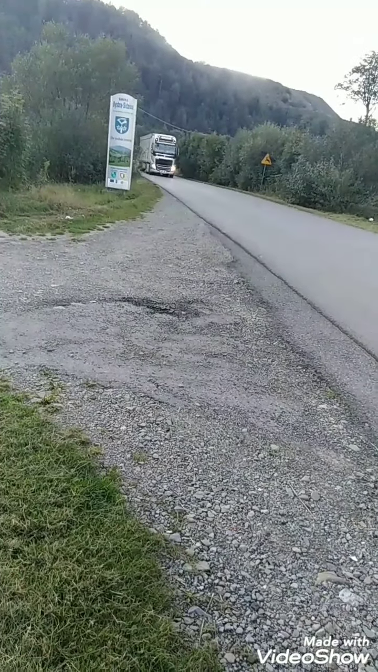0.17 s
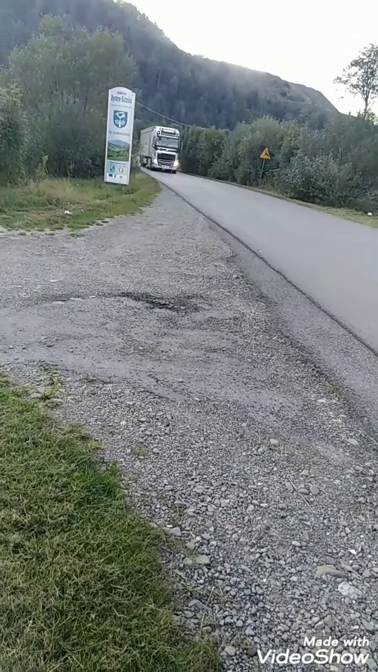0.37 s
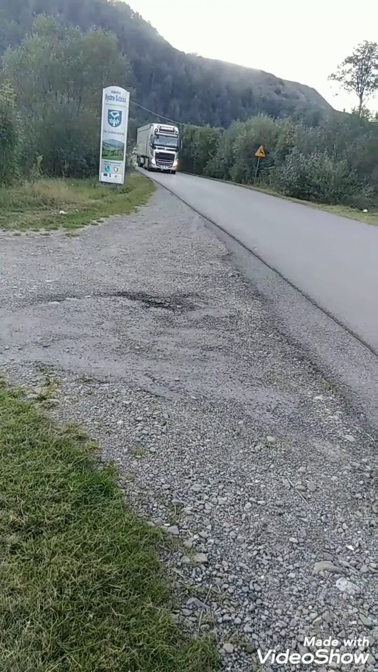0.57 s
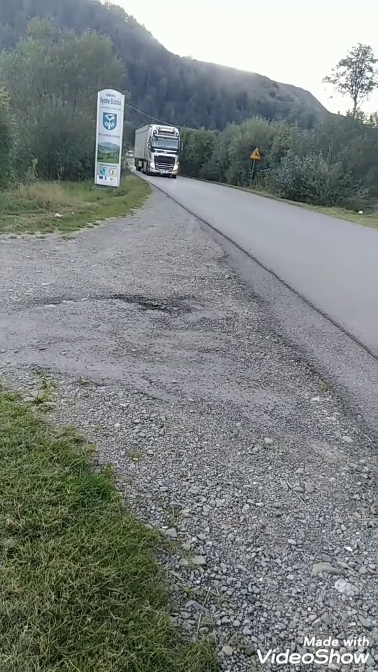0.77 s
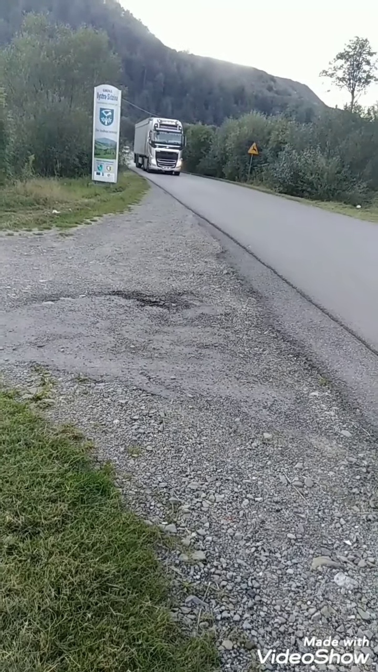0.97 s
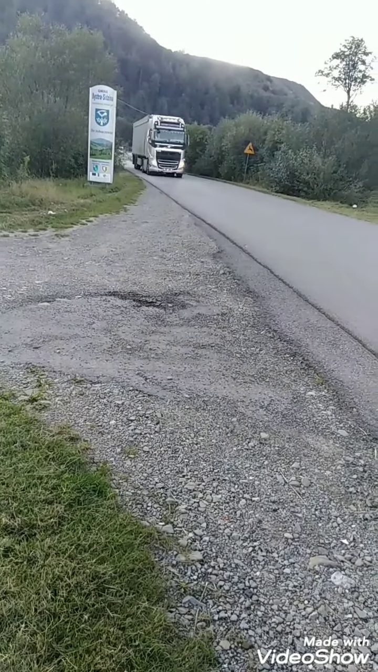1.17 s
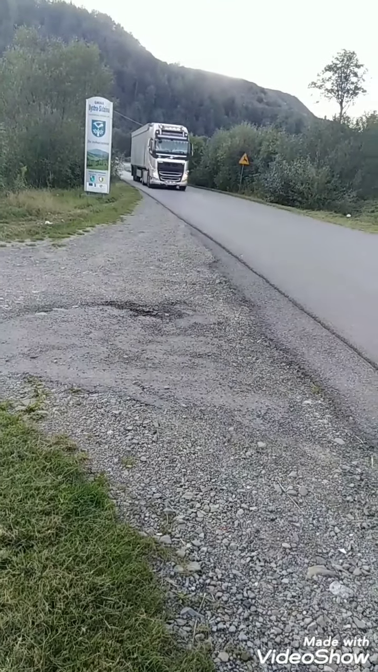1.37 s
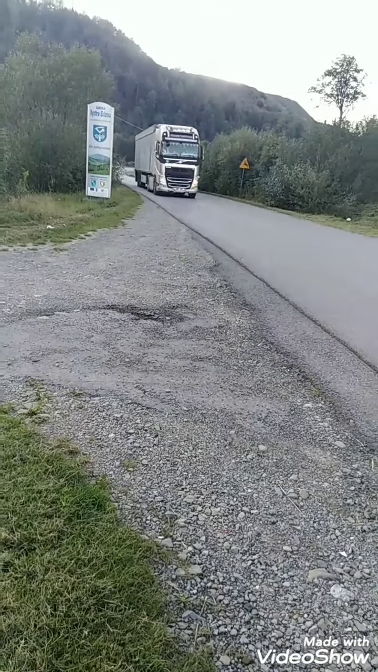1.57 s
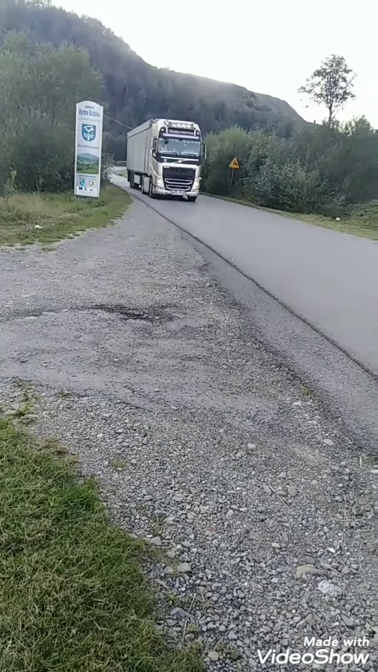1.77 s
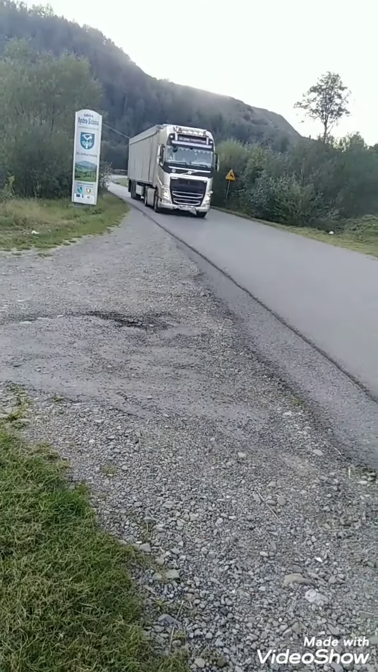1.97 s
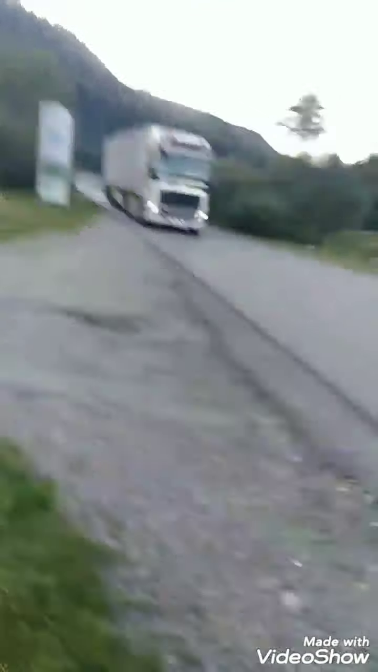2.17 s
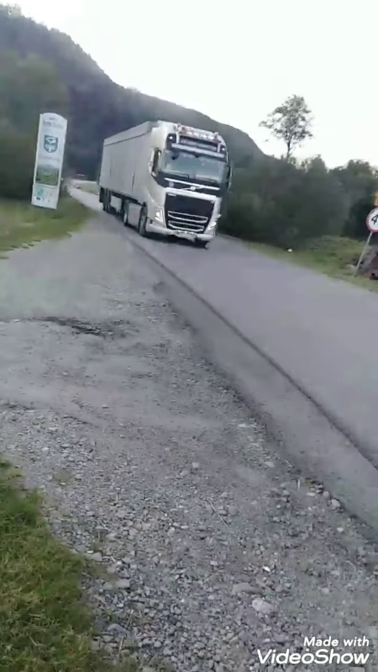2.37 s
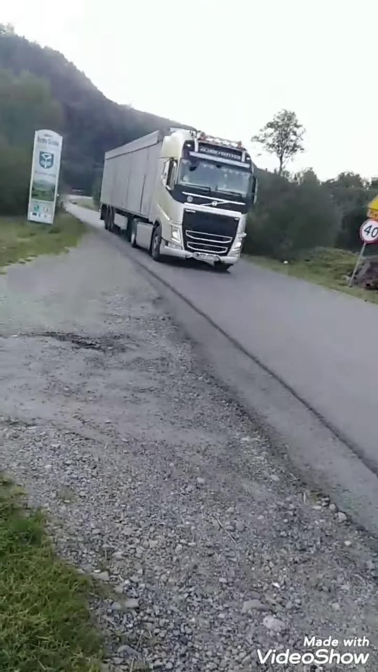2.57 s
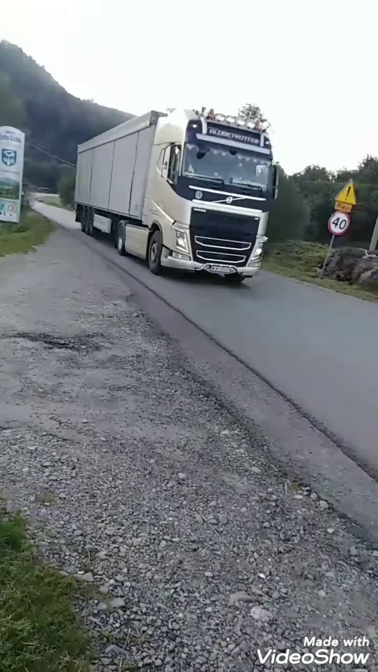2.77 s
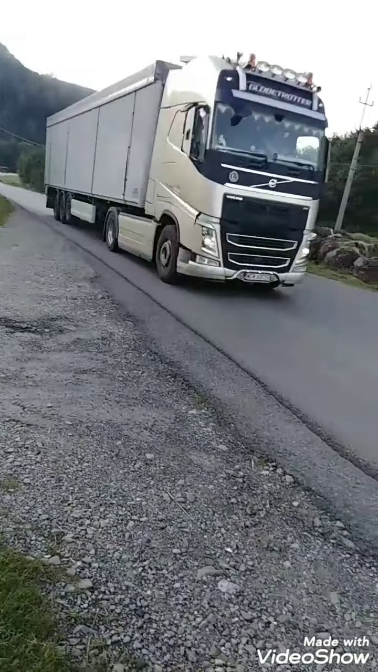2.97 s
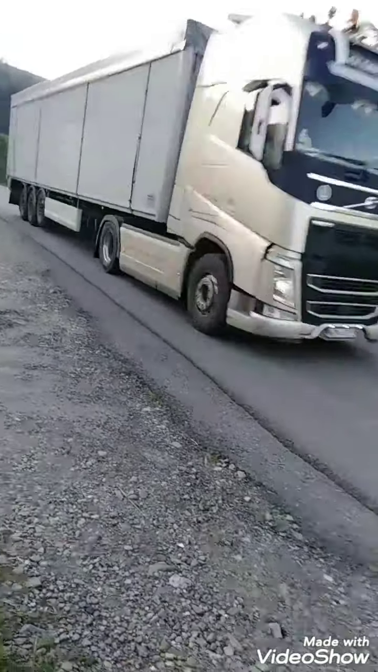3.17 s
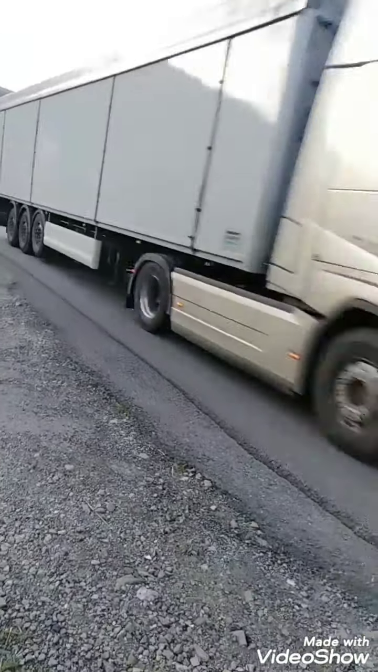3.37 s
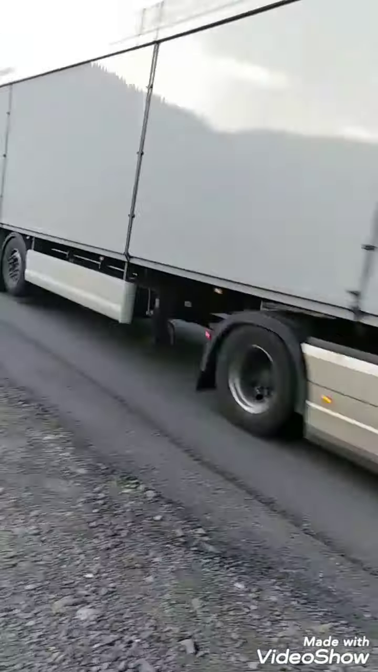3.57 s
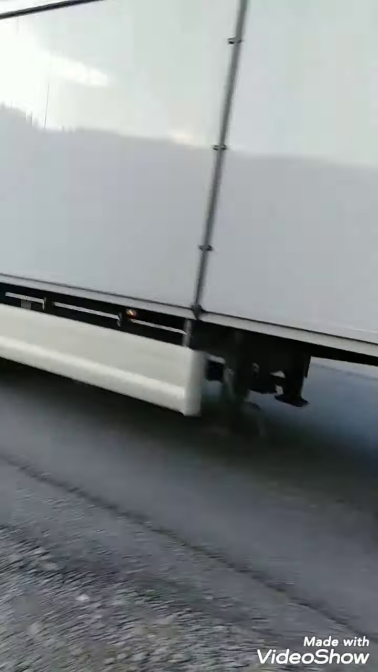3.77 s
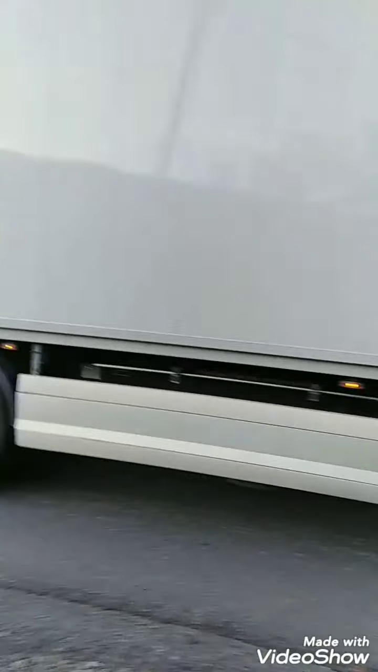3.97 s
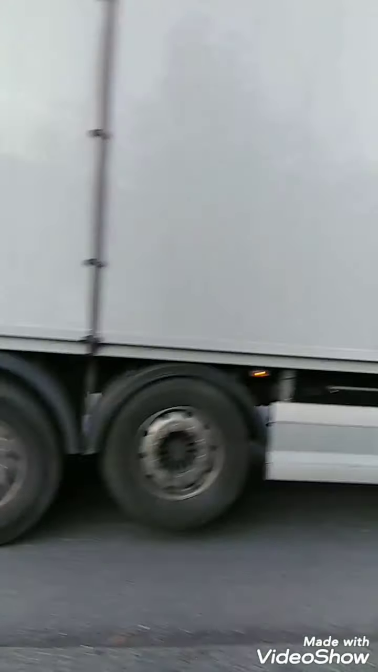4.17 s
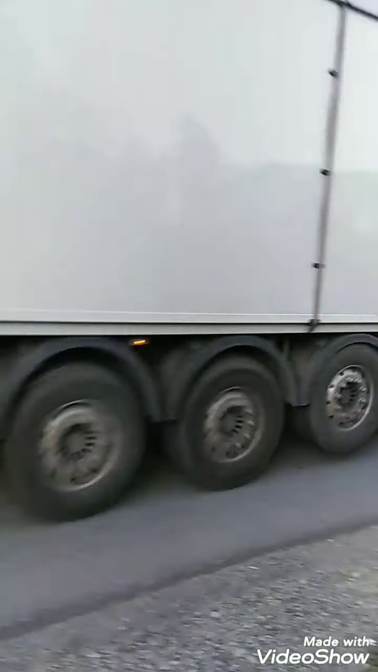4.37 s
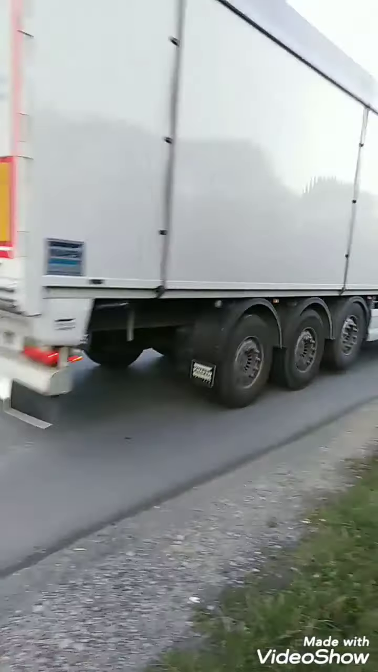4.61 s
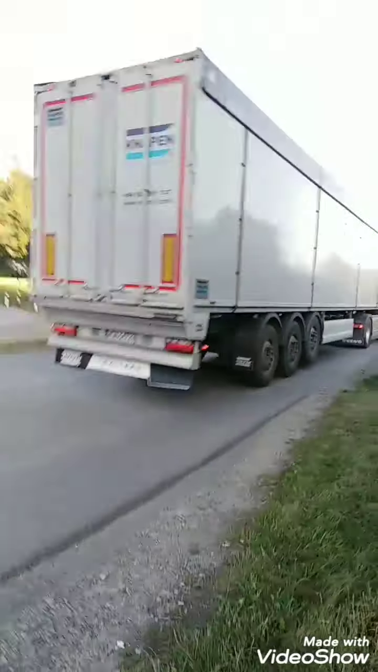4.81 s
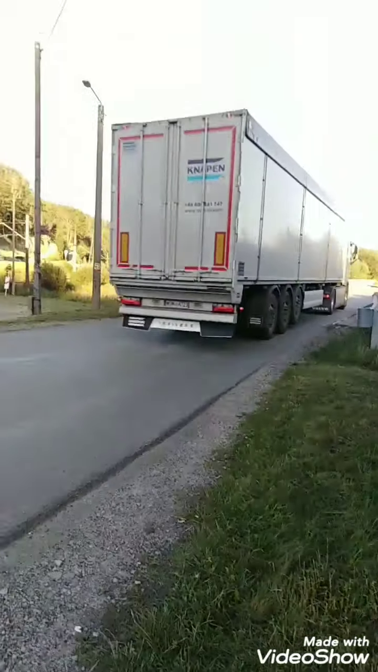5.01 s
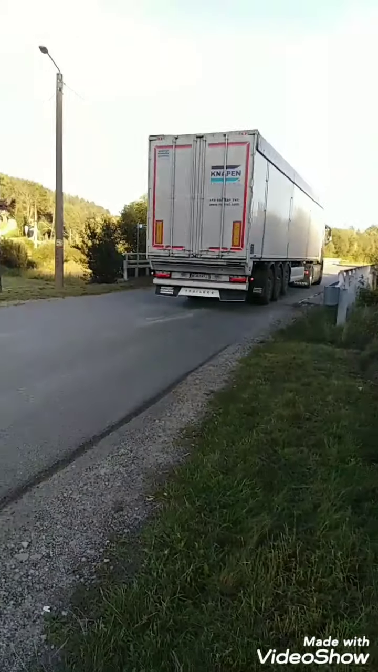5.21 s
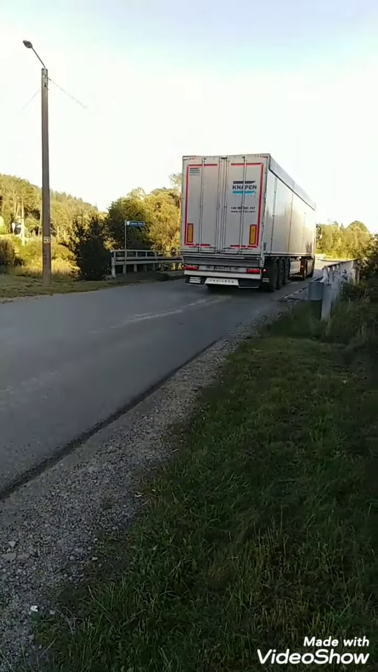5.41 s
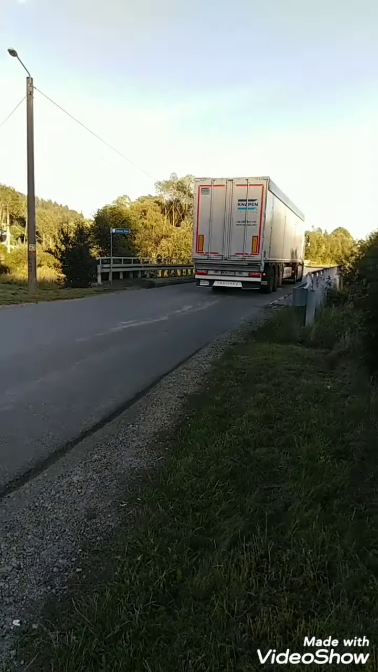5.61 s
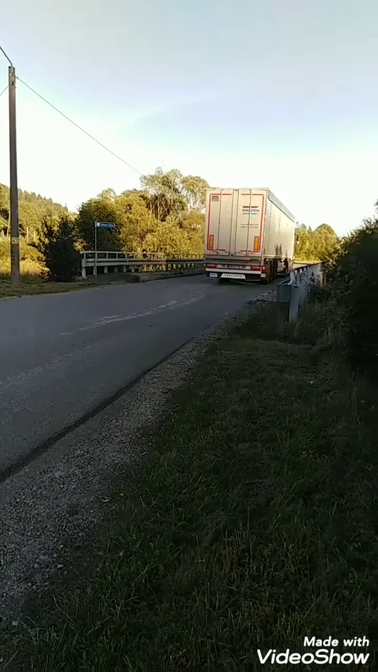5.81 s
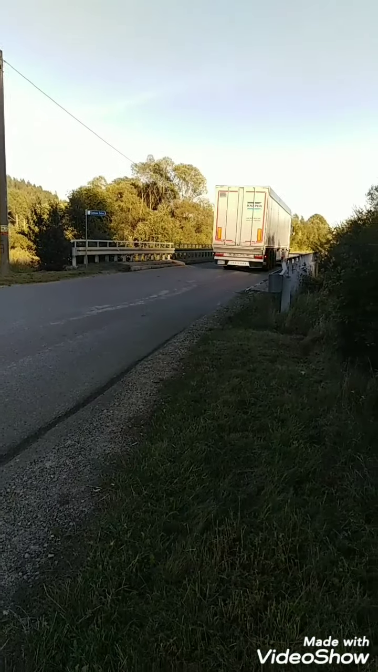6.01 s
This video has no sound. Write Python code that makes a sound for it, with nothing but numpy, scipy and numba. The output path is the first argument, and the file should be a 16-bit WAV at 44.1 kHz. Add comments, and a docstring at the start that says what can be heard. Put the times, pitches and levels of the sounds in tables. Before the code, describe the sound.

An articulated truck nears steadily, engine humming beneath growing road noise. Its air horns blare once, long and brassy, pause with an echoing tail, then give a short, very loud toot almost beside the stereo phone microphone. The trailer sweeps by with rumbling air, howling tyres, gritty cracks and a thin airy whistle, before everything recedes.

```python
"""A diesel drone and tyre roar come up a country road: an articulated truck nears a phone at the roadside.
Its twin air horns sound one long blast, then a short toot from close by; reeds chop air into bells that brighten
with pressure, bounce off the asphalt and echo from hedge, trees and hillside. Filtered noise makes the road sound,
narrow resonances howl and whistle, and grit cracks behind. A limiter ducks the road under loud blasts."""
import sys
import numpy as np
from scipy import signal
from scipy.fft import rfft, irfft
from scipy.io import wavfile
from scipy.ndimage import minimum_filter1d
from numba import njit

SR = 44100
rng = np.random.default_rng(int(sys.argv[2]) if len(sys.argv) > 2 else 0)


def log_audio(samples):
    """Write samples as a 16-bit WAV file to the path given in sys.argv[1]."""
    # one column per channel
    frames = np.atleast_2d(samples).T
    # limit to full scale, then quantise
    limited = np.clip(frames, -1, 1)
    pcm = np.round(limited * 32767).astype(np.int16)
    wavfile.write(sys.argv[1], SR, pcm)


N = 266805
TIME = np.arange(N) / SR
FREQ = np.maximum(np.fft.rfftfreq(N, 1 / SR), 1)

# Where the truck lies as the phone turns after it.
# Each row: time in seconds, lag of the left microphone port in ms, apparent width 0-1.
BEARING = [(0, 0.2, 0.65), (3.1, 0.19, 1), (3.6, -0.04, 0.8), (4.7, -0.04, 0.65), (5.3, 0.1, 0.78)]

# the drive: steady speed, moment the cab is abreast, closest distance, heights above the road
SPEED_M_S, CAB_S, KERB_M, HORN_HEIGHT_M, PHONE_HEIGHT_M = 15, 3.305, 3.9, 4.03, 1.135
SOUND_M_S = 343
# the middle of the truck is abreast at MIDDLE_S; its flank fills the view for ALONGSIDE_S on either side
MIDDLE_S, ALONGSIDE_S = 4, 1.05
FIRING_HZ = 79.6  # at the source, before the Doppler shift

# air fills a horn fast; the standing wave builds; partials above the edge fade, and the edge follows the pressure
FILL_S, BUILD_S, EDGE_HZ, SLACK_EDGE_HZ, EDGE_STEEPNESS = 0.045, 0.042, 20000, 300, 2.5
# the opening bark is brief; the pitch trembles (share), most while a reed catches
BARK_S, JITTER, RASP_S = 0.024, 0.0029, 0.011
# rising pressure pushes a reed flat; over a held blast the pitch creeps up
SAG_S, CREEP_HZ_PER_S = 0.025, 3
# a reed jumps to pitch, overshoots and settles; it runs sharp on slack air and droops after the valve shuts
CATCH_S, OVERSHOOT_HZ, SETTLE_S = 0.005, 1.5, 0.05
SLACK_HZ, DROOP_HZ_PER_S, DROOP_AFTER_S = 2, 45, 0.06
# the valve eases once during the long blast: time, half length, share of pressure lost
EASE_S, EASE_HALF_S, EASE_SHARE = 2.35, 0.033, 0.76
# the reeds stall this long after the valve shuts; a blast swells as the cab nears, its fundamental most
STALL_S, SWELL_DB_PER_S, BOOM_DB_PER_S = 0.085, 5.5, 14


def undb(db):
    """Decibels to amplitude."""
    return 10 ** (np.asarray(db) / 20)


def unit(x):
    """Scale to rms 1."""
    return x / np.sqrt(np.mean(x ** 2))


def curves(table):
    """The columns of a table, joined by straight lines in time."""
    s, *columns = np.transpose(table)
    return [np.interp(TIME, s, column) for column in columns]


def shape(points, hz):
    """A spectrum in dB, read on a log-frequency axis."""
    f, db = np.transpose(points)
    return np.interp(np.log(hz), np.log(f), db)


def colour(x, points):
    """Filter by a spectrum."""
    return irfft(rfft(x) * undb(shape(points, FREQ)), N)


def delay(x, ms):
    """A fixed or moving delay."""
    return np.interp(TIME - ms / 1000, TIME, x)


def walk(rate):
    """Smooth chance with spread 1, moving about rate times a second."""
    return unit(irfft(rfft(rng.standard_normal(N)) / (1 + (FREQ / rate) ** 4), N))


def along(abreast_s):
    """Metres down the road of a part of the truck: negative while it approaches."""
    return SPEED_M_S * (TIME - abreast_s)


def doppler(abreast_s):
    """Pitch factor of a part that drives past: above 1 on approach, below 1 going away."""
    x = along(abreast_s)
    return 1 / (1 + SPEED_M_S / SOUND_M_S * x / np.hypot(x, KERB_M))


def passing(*names):
    """Joint gain of sources: each falls as 1 / distance, with extra loss ahead of and behind it."""
    # Noise and tone sources along the truck. Each row: abreast in seconds, level then in dB, reach in m,
    # extra loss while it approaches in dB per m, extra loss while it recedes in dB per m.
    sources = { "tractor rumble": (3.55, -33, 6.8, 0.01, 0.03),
               "trailer rumble": (4.3, -35.5, 6, 0.01, 0.1), "front churn": (3.85, -32, 3, 0.02, 0.5),
               "rear churn": (4.35, -34.5, 2.5, 0.02, 0.5), "tractor roar": (3.58, -28, 6.5, 0.135, 0.26),
               "trailer roar": (4.35, -27.3, 5.7, 0.14, 0.28), "tractor hiss": (3.55, -35, 5, 0.04, 0.2),
               "trailer hiss": (4.45, -37, 4.6, 0.04, 0.22),
               "tractor spray": (3.55, -37.5, 4.2, 0.175, 0.75),
               "trailer spray": (4.45, -44, 3.6, 0.17, 0.58), "diesel": (3.2, -42.8, 24, 0.04, 0),
               "tread song": (3.4, -46, 12, 0.01, 0.6), "howl": (4.35, -32, 7, 0.03, 0.55),
               "whistle": (4.8, -44.3, 3, 3, 0.01), }
    power = 0
    for name in names:
        abreast_s, db, reach_m, ahead_db, behind_db = sources[name]
        x = along(abreast_s)
        r = np.hypot(x, reach_m)
        loss_db = np.where(x < 0, ahead_db, behind_db) * (r - reach_m)
        power = power + (undb(db - loss_db) * reach_m / r) ** 2
    return np.sqrt(power)


def diesel():
    """Six even cylinders, strongest at twice the firing rate; the pitch falls as the cab goes by."""
    hz = FIRING_HZ * doppler(CAB_S)
    phase = 2 * np.pi * np.cumsum(hz * (1 + 0.0068 * walk(11))) / SR
    drone = 0
    for k, order_db in enumerate((-2, 3.5, -21, -36), 1):
        drone = drone + undb(order_db + 2.3 * walk(14)) * np.sin(k * phase)
    return passing("diesel") * unit(drone), phase


def wide_noise(points, spread_hz):
    """Noise much alike at both ports in the bass, ever less alike above spread_hz; its width follows the bearing."""
    lag_ms, width = curves(BEARING)
    likeness = 0.88 / (1 + (FREQ / spread_hz) ** 2)
    mid = irfft(rfft(rng.standard_normal(N)) * np.sqrt(1 + likeness), N)
    side = irfft(rfft(rng.standard_normal(N)) * np.sqrt(1 - likeness), N)
    mid, side = colour(mid, points), width * colour(side, points)
    return np.array([delay(mid + side, lag_ms), mid - side]) / np.std(mid)


def road_noise(firing):
    """Exhaust and body rumble, air churns under the trailer, treads roar, hiss and spray on the asphalt."""
    # Road noise colours. Each row: frequency in Hz, relative density in dB per Hz.
    rumble_colour = [(25, -32), (42, -31), (52, 1.5), (70, -4.5), (105, 3), (170, -0.5), (230, -0.5),
                     (300, -7.5), (400, -16), (700, -50)]
    churn_colour = [(150, -4), (260, 5.5), (400, 1.5), (500, 8.5), (800, -71)]
    roar_colour = [(380, -67), (480, -3.5), (600, 0.5), (800, -1.5), (1000, 1.5), (1300, -0.5), (1700, 1.5),
                   (2000, -9), (2400, -16), (2900, -10), (5000, -40)]
    hiss_colour = [(1500, -19.5), (2300, 8), (2850, -2.5), (3200, 2.5), (4200, -0.5), (6000, -5),
                   (7500, -15), (12000, -47)]
    spray_colour = [(4500, -6.5), (7000, -1.5), (10000, -1.5), (12000, -3), (14500, -9)]
    rumble = wide_noise(rumble_colour, spread_hz=400) * passing("tractor rumble", "trailer rumble")
    churn = wide_noise(churn_colour, spread_hz=540) * passing("front churn", "rear churn")
    roar = wide_noise(roar_colour, spread_hz=680) * passing("tractor roar", "trailer roar")
    roar = roar * undb(0.8 * walk(9))
    hiss = wide_noise(hiss_colour, spread_hz=630) * passing("tractor hiss", "trailer hiss")
    # the hiss pulses slightly with the firing of the diesel
    hiss = hiss * undb(0.5 * walk(28)) * (1 + 0.093 * np.cos(firing))
    spray = wide_noise(spray_colour, spread_hz=2300) * passing("tractor spray", "trailer spray")
    spray = spray * undb(0.97 * walk(40))
    return rumble + churn + roar + hiss + spray


def singing(name, far_hz, near_hz, width_hz):
    """A narrow resonance, driven by noise, that is higher while the truck is alongside."""
    alongside = 1 / (1 + ((TIME - MIDDLE_S) / ALONGSIDE_S) ** 8)
    phase = 2 * np.pi * np.cumsum(far_hz + (near_hz - far_hz) * alongside) / SR
    band = walk(width_hz / 2) * np.cos(phase) + walk(width_hz / 2) * np.sin(phase)
    tone = passing(name) * unit(band)
    return np.array([delay(tone, curves(BEARING)[0]), tone])


def pressure(t, opens_s, shuts_s, bleed_s):
    """Air pressure 0-1: an S-shaped rise, a hold, then a bleed that is fast at first and slow at the end."""
    rise = (1 - np.exp(-(t - opens_s) / FILL_S)) ** 3
    ease = 1 - EASE_SHARE * np.exp(-((t - EASE_S) / EASE_HALF_S) ** 2)
    bleed = (1 + np.maximum(t - shuts_s, 0) / bleed_s) ** 2
    return np.maximum(rise * ease / bleed, 1e-6)


def reed(t, catches_s, shuts_s, pitch_hz, flat_hz, rasp, air):
    """Pitch of a reed: starts in tune, is pushed flat until it catches with a rasp, droops once the air is gone."""
    age = t - t[0]
    caught = (1 + np.tanh((t - catches_s) / CATCH_S)) / 2
    pushed = 1 - np.exp(-(age / SAG_S) ** 2)
    hz = pitch_hz + CREEP_HZ_PER_S * age - flat_hz * pushed * (1 - caught)
    hz = hz + OVERSHOOT_HZ * caught * np.exp(-np.abs(t - catches_s) / SETTLE_S)
    hz = hz + SLACK_HZ * (1 - air) - DROOP_HZ_PER_S * np.maximum(t - shuts_s - DROOP_AFTER_S, 0)
    catching = rasp * np.exp(-((t - catches_s) / RASP_S) ** 2)
    return hz * (1 + JITTER * walk(90)[:len(t)] + catching * walk(260)[:len(t)])


def trumpet(t, hz, edge_hz, bark_share, close, boom_db, ring_db, flutter,
            bounce=0.42, lag_ms=0.35, max_lag_rad=1.8, dispersion=0.06, count=52):
    """A reed chops air into a horn; the wave steepens with pressure and arrives again off the road."""
    # Radiation of the bells at full pressure. Each row: frequency in Hz, relative level per partial in dB.
    bell = [(270, -12), (540, -14.5), (810, -12.5), (1080, -12), (1350, -8), (1620, -8), (1900, -11),
            (2700, -13.5), (3800, -17), (5000, -22.5), (7500, -26.5), (10000, -25), (12000, -35),
            (14500, -30)]
    # A horn speaks first with a bark at its strongest resonances.
    # Each row: frequency in Hz, boost from afar in dB, boost from close below in dB.
    bark_points = [(270, 23, -3), (540, 24, 16), (810, 17, -26), (1080, -6, -14), (1620, 2, -12),
                   (2700, 0, 2)]
    bark = [(f, far_db + close * (close_db - far_db)) for f, far_db, close_db in bark_points]
    phase = 2 * np.pi * np.cumsum(hz) / SR
    # the path by way of the asphalt is longer than the straight one
    r = np.hypot(SPEED_M_S * (t - CAB_S), KERB_M)
    bounced_m = np.hypot(r, HORN_HEIGHT_M + PHONE_HEIGHT_M)
    detour_m = bounced_m - np.hypot(r, HORN_HEIGHT_M - PHONE_HEIGHT_M)
    road = 2 * np.pi * hz * detour_m / SOUND_M_S
    port = 2 * np.pi * hz * lag_ms / 1000
    knots = t[0] + np.arange(32) / 28  # the flutter takes a new course 28 times a second
    total, centre = 0, np.median(hz)
    for k in range(1, count + 1):
        # once the reed has stalled, the higher partials ring down faster
        db = shape(bell, k * centre) + boom_db * (k == 1) + bark_share * shape(bark, k * centre) + k * ring_db
        gain = undb(db) / (1 + (k * centre / edge_hz) ** EDGE_STEEPNESS)
        # the standing wave takes time to build, longest for the fundamental
        gain = gain * (1 - np.exp(-((t - t[0]) * k / BUILD_S) ** 2))
        # moving reflections make each partial flutter at each port, the short waves most
        stray = rng.standard_normal((2, len(knots))) + 1j * rng.standard_normal((2, len(knots)))
        stray = np.array([np.interp(t, knots, row) for row in stray])
        stray = flutter * np.tanh(k * centre / 900) * stray
        # the left port lags, by a phase that levels off for short waves
        lag = max_lag_rad * np.tanh(k * port / max_lag_rad)
        wave = np.exp(1j * (np.array([k * phase - lag, k * phase]) + dispersion * k * k))
        total = total - gain * np.real(wave * (1 + bounce * np.exp(-1j * k * road) + stray))
    return total


def horns(opens_s, catches_s, shuts_s, bleed_s, ring_t60, pitch_hz, flat_hz, rasp, level_db, boom_db, close,
          far_flutter=0.7, near_flutter=0.4, left_db=0.5):
    """One sounding at both ports: air drives reed and bell; close by it is louder and less blurred by reflections."""
    # The bells heard from close below. Each row: frequency in Hz, gain in dB, left minus right in dB.
    close_colour = [(270, -3, -1), (540, 8, -1), (810, 10.5, 0), (1080, 6, 0), (1500, 7.5, 0),
                    (2700, 3.5, 0), (4500, 3.5, 1), (8000, 9, 4), (13000, 12, 2)]
    on = (TIME > opens_s) & (TIME < shuts_s + 0.4)
    t, out = TIME[on], np.zeros((2, N))
    air = pressure(t, opens_s, shuts_s, bleed_s)
    hz = reed(t, catches_s, shuts_s, pitch_hz, flat_hz, rasp, air)
    edge_hz = EDGE_HZ * air + SLACK_EDGE_HZ * (t > shuts_s)
    bark_share = np.exp(-(t - opens_s) / BARK_S)
    blown_s = np.minimum(t, shuts_s) - opens_s
    ring_db = -60 * np.maximum(t - shuts_s - STALL_S, 0) / ring_t60
    flutter = far_flutter + close * (near_flutter - far_flutter)
    boom_db = boom_db + BOOM_DB_PER_S * blown_s
    tone = trumpet(t, hz, edge_hz, bark_share, close, boom_db, ring_db, flutter)
    out[:, on] = undb(SWELL_DB_PER_S * blown_s) * tone
    ports = []
    for port, side in zip(out, (1, -1)):
        tint = [(f, level_db + side * left_db + close * (db + side * pan_db / 2))
                for f, db, pan_db in close_colour]
        ports.append(colour(port, tint))
    return np.array(ports)


def scatter(x, t60, start_s):
    """A diffuse tail that builds up over start_s, different at each port."""
    tail = rng.standard_normal((2, N)) * undb(-60 * TIME / t60) * (1 - np.exp(-(TIME / start_s) ** 2))
    return signal.fftconvolve(x[None], unit(tail) / np.sqrt(N), axes=1)[:, :N]


def valley(horn, gravel_db=-5, trees_db=-18.5, hedge_db=-16, hedge_s=0.085, hill_db=-26, hill_s=0.3):
    """Gravel scatters the treble at once; a hedge slaps back, trees give a long tail, the hillside one late echo."""
    # Colour of the echo from the trees. Each row: frequency in Hz, gain in dB.
    foliage = [(100, -1), (270, -3), (600, 8), (1700, 3), (3000, -3), (6000, -5), (14000, -18)]
    treble = colour(horn, [(1500, -26), (3000, -10), (6000, 0)])
    bass = colour(horn, [(270, 0), (600, -6), (3000, -14), (8000, -35)])
    gravel = scatter(treble, t60=0.15, start_s=0.0011)
    trees = scatter(colour(horn, foliage), t60=1.23, start_s=0.033)
    hedge = delay(scatter(bass, t60=0.08, start_s=0.002)[0], 1000 * hedge_s)
    hill = delay(bass, 1000 * hill_s)
    return undb(gravel_db) * gravel + undb(trees_db) * trees + undb(hedge_db) * hedge + undb(hill_db) * hill


def horn_hum(start_s=3.48, end_s=4.66, fade_s=0.22, hum_hz=257, hum_db=-31, abreast_s=3.75):
    """A wavering low tone: the horn's reed hums on after the toot and drops in pitch as it goes by."""
    hz = hum_hz * doppler(abreast_s) * (1 + 0.018 * walk(27))
    phase = 2 * np.pi * np.cumsum(hz) / SR
    swell = np.clip(np.minimum(TIME - start_s, end_s - TIME) / fade_s, 0, 1)
    return swell * undb(hum_db + 2.2 * walk(13)) * np.sin(phase)


def grit(decay_s=0.0018, skitter_s=0.03, skitter_db=-13, grain_db=5):
    """Small stones crack from under the last axles and skitter on in tiny ticks: decaying bursts of noise."""
    # Grit flicked by the trailer wheels. Each row: time in seconds, level in dB.
    flicks = [(4.339, -32.5), (4.437, -35), (4.445, -31), (4.482, -26), (4.489, -30), (4.511, -33),
              (4.529, -31), (4.536, -34), (4.568, -33), (4.579, -35)]
    # Colour of cracking stone. Each row: frequency in Hz, relative level in dB.
    stone = [(1500, -30), (4000, 7), (7000, -3), (10500, -3), (14500, -15)]
    bursts, ticks = 0, unit(undb(grain_db * walk(300)))
    for s, db in flicks:
        age = np.abs(TIME - s)
        crack = np.exp(-age / decay_s)
        skitter = undb(skitter_db) * ticks * np.exp(-age / skitter_s)
        bursts = bursts + undb(db) * (TIME > s) * (crack + skitter)
    return bursts * unit(colour(rng.standard_normal((2, N)), stone))


def scene(close_echo_db=-7.5):
    """The moving truck, its horns and their echoes: treads sing and howl, and air whistles behind the trailer."""
    # In the long blast two horns catch in turn and beat; in the short toot they speak as one.
    # Each row: valve opens in s, reed catches in s, valve shuts in s, bleed time in s, ring t60 of the
    # fundamental in s, pitch in Hz, pushed flat by Hz, rasp as a share of pitch, level before the swell in dB,
    # extra fundamental at the opening in dB, heard from close below 0-1.
    blasts = [(1.980, 2.032, 2.461, 0.017, 0.2, 268.4, 5, 0.022, -13.3, -10, 0),
              (1.981, 2.145, 2.461, 0.017, 0.2, 270.9, 1.45, 0.012, -16.5, -10, 0),
              (3.076, 3.151, 3.166, 0.02, 0.42, 268.4, 7, 0.024, -6, 15.3, 1)]
    drone, firing = diesel()
    road = road_noise(firing)
    song = singing("tread song", far_hz=725, near_hz=780, width_hz=140)
    howl = singing("howl", far_hz=558, near_hz=745, width_hz=200)
    soundings = [horns(*blast) for blast in blasts]
    # the echoes are fed from the right port, and less by a blast from close by
    to_valley = sum(horn[1] * undb(close_echo_db * blast[-1]) for horn, blast in zip(soundings, blasts))
    echo = valley(to_valley)
    whistle = singing("whistle", far_hz=2700, near_hz=3400, width_hz=630)
    return drone + road + song + howl + sum(soundings) + echo + horn_hum() + grit() + whistle


@njit
def follow(x, attack, release):
    """An envelope that rises fast and falls slowly."""
    out, e = np.empty(len(x)), 0.
    for i in range(len(x)):
        e += (x[i] - e) * (attack if x[i] > e else release)
        out[i] = e
    return out


def record(dry, threshold_db=-2.5, release_s=0.06, top_hz=14250):
    """Two unlike microphone ports; a look-ahead limiter holds loud blasts down, peaks are rounded, the top is cut."""
    # The phone's two microphone ports. Each row: frequency in Hz, left minus right in dB.
    ports = [(60, 2.5), (200, 2), (380, 2), (700, -0.5), (1300, -1), (2400, -2.2), (4300, -1.5), (8000, -8),
             (11000, -13), (14500, -2.5)]
    balance_db = shape(ports, FREQ) / 2
    sound = irfft(rfft(dry) * undb([balance_db, -balance_db]), N)
    peaks = -minimum_filter1d(-np.abs(sound).max(axis=0), size=129)
    envelope = follow(peaks, 0.05, 1 / (release_s * SR))
    # most, but not all, of the excess over the threshold is taken off
    sound = sound / np.maximum(envelope / undb(threshold_db), 1) ** 0.7
    sound = sound / (1 + (sound / 0.97) ** 8) ** (1 / 8)
    low_pass = signal.ellip(10, 0.1, 60, top_hz, fs=SR, output="sos")
    return signal.sosfiltfilt(low_pass, sound)


dry = scene()
out = record(dry)
log_audio(out)
```